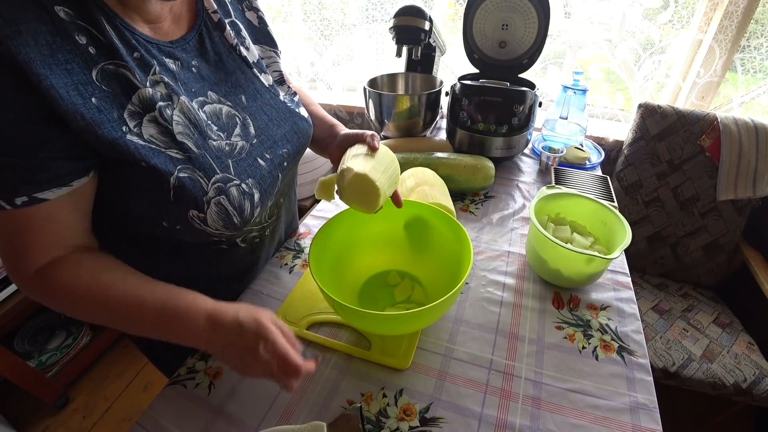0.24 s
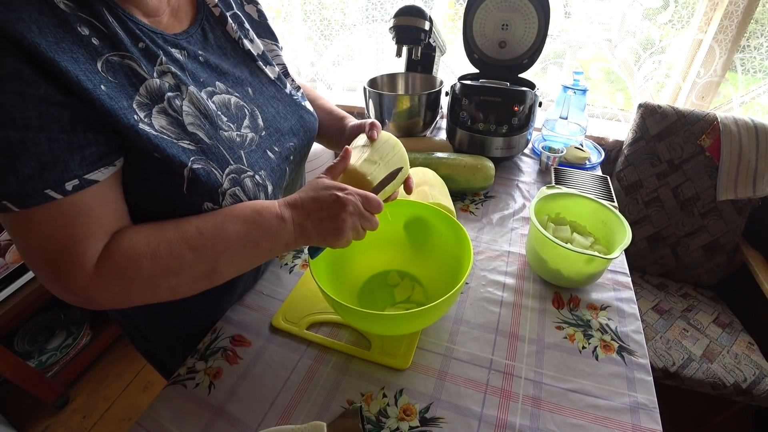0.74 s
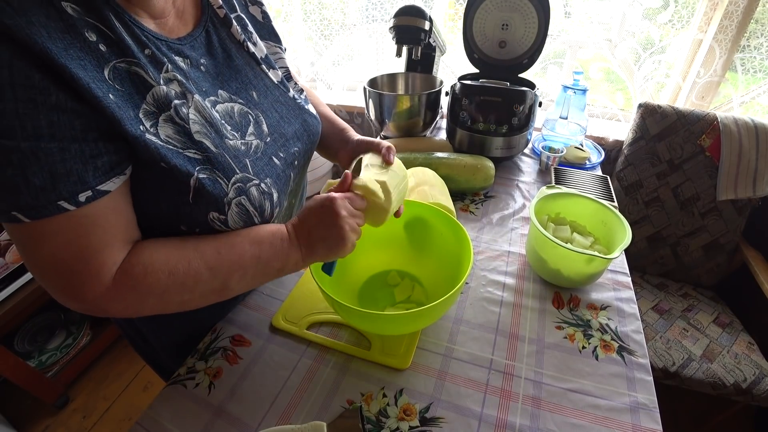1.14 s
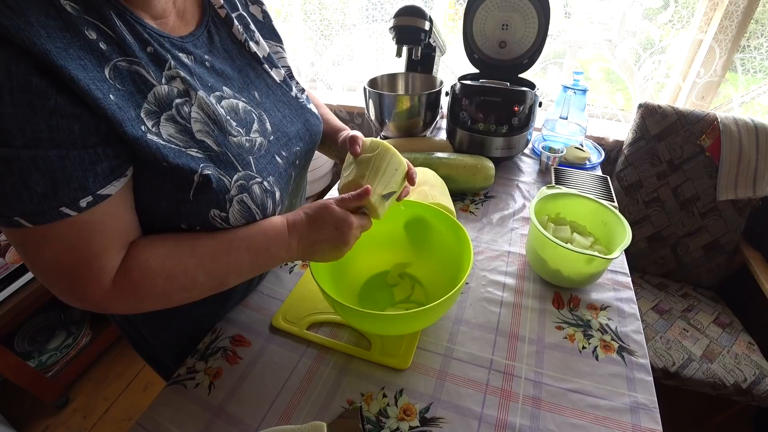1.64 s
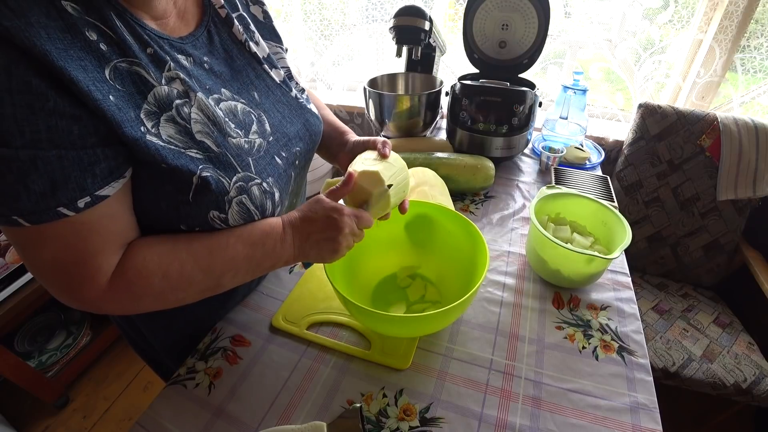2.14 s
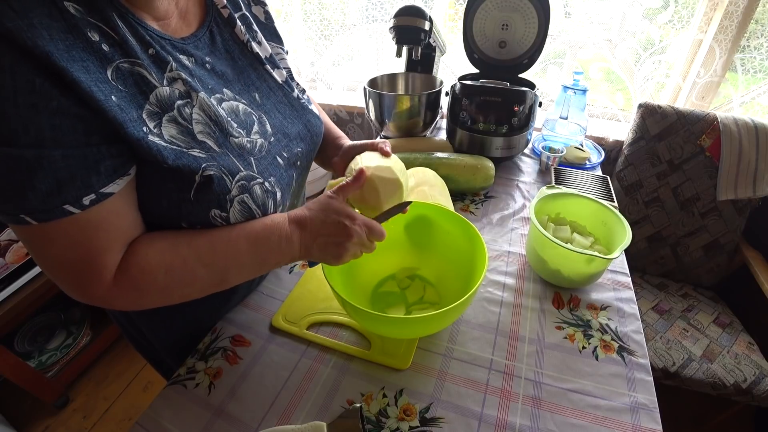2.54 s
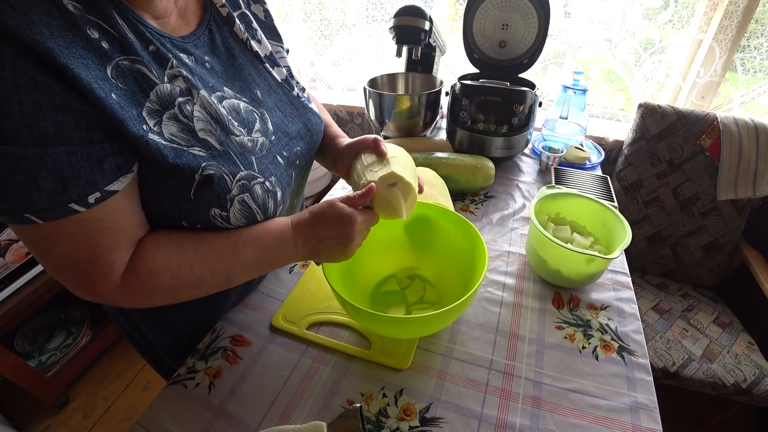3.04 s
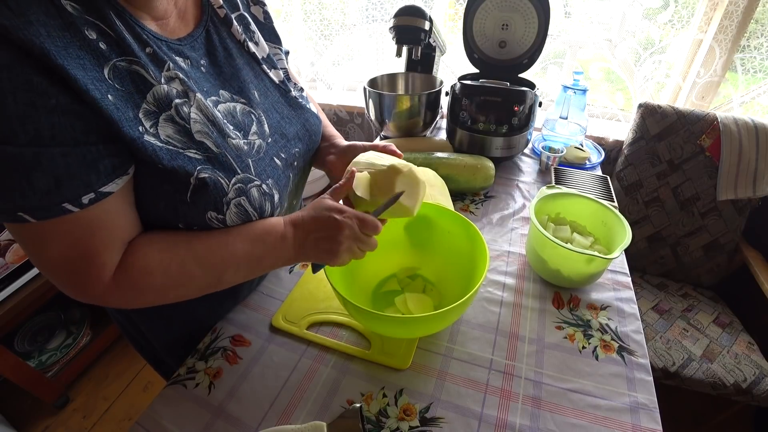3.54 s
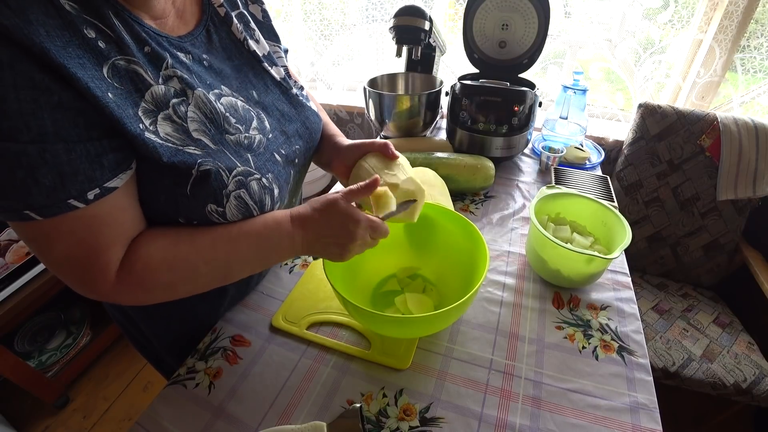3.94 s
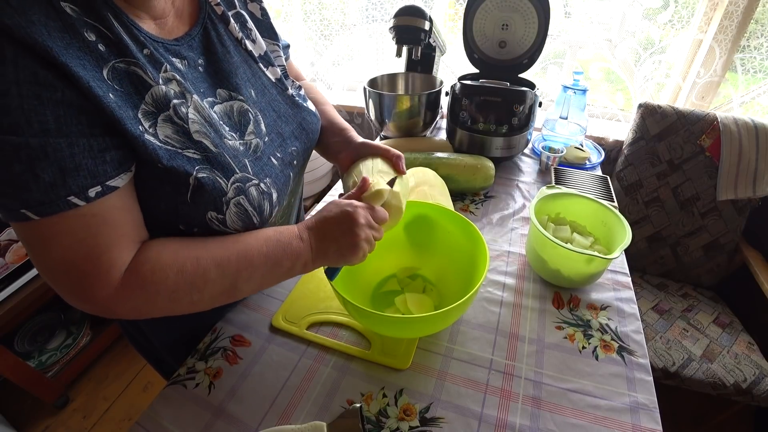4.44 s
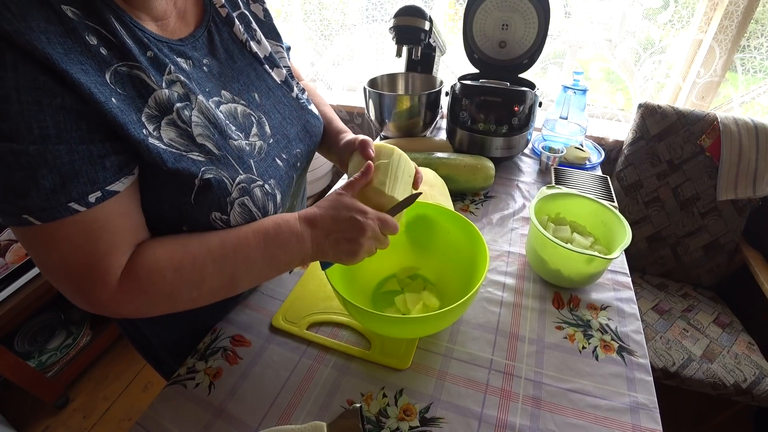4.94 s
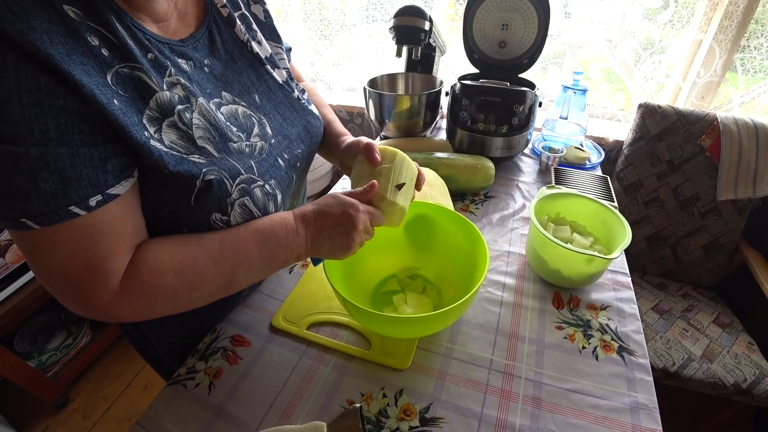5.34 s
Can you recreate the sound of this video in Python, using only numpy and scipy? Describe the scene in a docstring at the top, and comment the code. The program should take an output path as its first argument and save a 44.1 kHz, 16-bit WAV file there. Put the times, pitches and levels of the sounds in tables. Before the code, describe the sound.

Wet vegetable chunks knock into a plastic bowl as a knife scrapes and crunches through firm flesh in a humming kitchen.

```python
"""Cutting zucchini over a bowl

After a faint hiss of handling, a knife rasps through wet, peeled flesh in long draws and slips.
The flesh snaps through; chunks tumble into a plastic bowl, which rings.
Steel squeaks, hands rustle and bump. An appliance hums in the small kitchen."""
import sys
import numpy as np
from scipy import signal
from scipy.fft import rfft, irfft
from scipy.io import wavfile

SR = 44100
rng = np.random.default_rng(int(sys.argv[2]) if len(sys.argv) > 2 else 0)


def persist_wave(psi):
    """Save psi, clipped to +-1, as 16-bit WAV."""
    counts = np.round(np.clip(psi, -1, 1) * 32767).astype(np.int16)
    wavfile.write(sys.argv[1], SR, np.atleast_2d(counts).T)


N = 247309
TIME_S = np.arange(N) / SR
RING_S = TIME_S[:SR // 2]
ATTACK_SAMPLES, EARLY_SAMPLES = int(.008 * SR), int(.03 * SR)

# appliance hum (frequency [Hz], level [dB])
HUM_LINES = [(48.4, -51.5), (145.3, -64.5), (199.2, -66), (247.6, -70.5), (296.1, -59.5), (344.5, -78),
             (441.4, -70.5)]
# room air (frequency [Hz], relative density [dB])
AIR_SPECTRUM = [(20, 0.5), (45, -13), (80, 1), (120, -5), (250, -7), (450, -8.5), (800, -13.5),
                (1500, -19.5), (3200, -22), (3750, -17), (4300, -22.5), (7500, -22.5), (11000, -29)]
# stereo width of the air (frequency [Hz], side re mid [dB])
AIR_SIDE = [(60, -21), (110, -10), (190, -6.5), (350, -5.5), (620, -1.5), (1120, 2.5), (2010, 3),
            (3600, -3), (6460, -4.5), (11600, -2.5)]
# hands and knife brush cloth and skin (time [s], nominal length [s], centre [Hz], relative level [dB])
BRUSHES = [(0.0, 0.039, 322, -49), (0.0, 0.19, 200, -48.5), (0.062, 0.035, 730, -49),
           (0.145, 0.043, 910, -49.5), (0.176, 0.27, 610, -61), (1.61, 0.04, 310, -46.5),
           (1.805, 0.27, 197.5, -42.5), (2.195, 0.056, 503, -39), (2.271, 0.2, 200, -46),
           (2.402, 0.071, 201, -40.5), (4.041, 0.04, 900, -53)]
# steel squeaks (time [s], nominal length [s], end pitch [Hz], level [dB])
STEEL_SQUEAKS = [(0.065, 0.0045, 7300, -54), (0.085, 0.023, 9100, -61), (0.138, 0.0024, 9000, -38.5),
                 (0.155, 0.016, 8840, -53), (1.687, 0.0093, 7840, -42), (2.213, 0.018, 6280, -34.5)]
# first row: faint, soft hiss of handling or a sleeve before the cutting; other rows: blade draws
# (time [s], length [s], relative hiss [dB], rasp re hiss [dB])
RUBS = [(0.35, .32, -59, -20), (0.83, 0.41, -53.5, -18), (1.089, 0.079, -40, -15),
        (1.549, 0.13, -46.5, -10), (1.701, 0.1, -38.5, -13.5), (1.737, 0.17, -51, 10), (2.1, 0.21, -47, -6),
        (2.21, 0.042, -36.5, -6.5), (2.679, 0.18, -52, -4), (2.738, 0.3, -42.5, -12),
        (3.07, 0.089, -42.5, -9.5), (3.497, 0.31, -60, -22), (3.848, 0.12, -59, -11),
        (4.23, .46, -54, -8.5), (4.576, 0.085, -43, -15.5), (5.026, 0.2, -53, -8),
        (5.287, 0.13, -44.5, -10.5), (5.43, 0.047, -49.5, -15), (5.48, 0.14, -43, -13)]
# speed over a rub (position [0-1], speed [0-1])
RUB_SPEED = [(0, 0), (.18, 0.5), (.62, 1), (1, 0)]
# blade sticks and jumps (time [s], relative hiss [dB])
BLADE_SLIPS = [(.847, -54), (0.901, -53.5), (.949, -50.5), (0.983, -41.5), (1.015, -39), (1.054, -37),
               (1.089, -39.5), (1.662, -41.5), (1.691, -39), (1.814, -48.5), (2.153, -37.5), (2.18, -41),
               (3.757, -55), (3.801, -53), (4.323, -48), (4.378, -41.5), (4.433, -39.5), (4.463, -43.5),
               (4.508, -40), (4.641, -42.5), (5.072, -49.5), (5.199, -50.5), (5.305, -43.5)]
# bright friction (frequency [Hz], gain [dB])
HISS_SPECTRUM = [(1000, -13), (2900, -11), (3700, 2), (4400, -1.5), (5300, 1.5), (7800, 1.5), (9500, -1),
                 (11500, -5)]
# midrange friction (frequency [Hz], gain [dB])
RASP_SPECTRUM = [(300, -51), (700, -2.5), (1150, 3.5), (1700, 3), (2400, -3.5), (3500, -0.5), (6000, -62)]
# blade breaks through (time [s], knock [Hz], force [dB], sharpness [dB])
BREAKS = [(1.459, 1146, .5, 5.5), (1.58, 1173, -26.5, -1.5), (1.738, 980, -2.5, -39), (1.821, 1350, -13, 1),
          (1.83, 1150, -10, 0), (1.853, 1310, -15, -3), (1.886, 1580, -12, 0), (1.901, 1140, -9, -1.5),
          (1.952, 1500, -17.5, -3), (2.4, 1124, -1.5, 3.5), (3.118, 1674, -1, -4.5),
          (3.178, 1550, -19, -13), (4.974, 1210, -26.5, -9)]
# snap's thud, knock, tock, crack (base [dB], force slope [dB/dB], sharpness slope [dB/dB])
SNAP_MIX = [(-30, .85, -0.06), (-29.5, 0.52, .95), (-23, 1.06, 0), (-28, 1.3, 1.19)]
# damped thud of the flesh (frequency [Hz], weight [dB], t60 [s])
FLESH_MODES = [(218, -12, 0.073), (287, -7.5, 0.059), (376, 0.5, 0.011), (487, -13.5, 0.08),
               (523, -10.5, 0.075), (664, -6.5, 0.041)]
# higher tock of the firm vegetable (frequency [Hz], weight [dB], t60 [s])
TOCK_MODES = [(1817, -3, 0.012), (2022, -6.5, 0.019), (2246, -4, 0.016), (2650, 5, 0.0024)]
# blade, damped by flesh (frequency [Hz], weight [dB], t60 [s])
BLADE_MODES = [(2940, -21, 0.024), (4380, 19.5, 0.0087), (5320, 3, 0.022), (5670, -37, 0.031),
               (5705, 9.5, 0.054)]
# fracture (frequency [Hz], gain [dB])
CRACK_SPECTRUM = [(1200, -68), (2600, -56), (3200, 1), (3700, 3), (4800, 11.5), (6000, -1.5), (7500, -5),
                  (9500, -12.5), (11500, -17)]
# arms and table bump (time [s], pitch [Hz], relative level [dB])
ARM_BUMPS = [(1.751, 80, -48), (1.847, 62, -41), (1.999, 97, -45), (2.031, 35.3, -40.5),
             (2.289, 78.2, -46.5), (2.87, 63, -40.5), (2.918, 30.4, -43), (3.129, 69, -47)]
# chunks land and bounce (time [s], knock [Hz], force [dB], sharpness [dB])
LANDINGS = [(2.061, 1257, -0.5, -10), (2.092, 1294, -12, 4), (2.183, 1360, -12, 2),
            (2.2077, 1126, -13.5, 7), (2.432, 1280, -8, 8), (2.436, 1310, -10.5, 3), (2.464, 1080, -9, 1.5),
            (2.577, 1394, -9.5, -15), (2.633, 1185, -17.5, -6.5), (3.376, 1040, -23, -11),
            (3.38, 1077, -8.5, -2.5), (3.39, 1000, -22.5, 15), (3.411, 254, -16, -12),
            (3.495, 960, -29, -21), (5.013, 1120, -13, -10), (5.06, 1090, -24, -10)]
# landing's thud, knock, tock, slap (base [dB], force slope [dB/dB], sharpness slope [dB/dB])
LANDING_MIX = [(-25.5, 0.76, -0.1), (-20, 1.02, 0), (-28.5, 0.68, 0.48), (-33, 0.65, 0.97)]
# bowl bottom thuds on the board (frequency [Hz], weight [dB], t60 [s])
BOTTOM_MODES = [(176, -6, 0.072), (260.7, -3, 0.11), (335, 4, 0.064), (395, 7, 0.016), (485, 5, 0.045),
                (602, 0, 0.049)]
# long ring of the bowl (frequency [Hz], weight [dB], t60 [s])
BOWL_MODES = [(256, -7, .7), (427, 0, .3), (482, -6, .3), (518, -3, .35), (551, -6, .3), (598, -5, .35),
              (845, -7, .22), (971, -5, .29), (1103, -4, .33), (1254, 0, .22), (1521, -9, .3),
              (1682, -11, .25)]
# wet slap (frequency [Hz], gain [dB])
SLAP_SPECTRUM = [(700, -8), (1500, -9.5), (2800, 2.5), (4000, -6.5), (5500, -5), (7500, -11.5), (9500, -24),
                 (11500, -28)]
# window and wall reflections (nominal delay [s], gain [dB])
WALL_ECHOES = [(.0075, -13), (0.0169, -20.5), (0.0197, -16.5)]
# reverb decay (frequency [Hz], t60 [s])
ROOM_DECAY = [(150, 0.65), (400, 0.2473), (1000, 0.45), (2800, 0.3), (7500, 0.32)]
# reverb colour (frequency [Hz], gain [dB])
ROOM_SPECTRUM = [(100, -3), (250, -4), (500, 9.5), (1000, -4.5), (2200, -1.5), (5000, -9), (11000, -14)]


def undb(db):
    """Decibels to gain."""
    return 10 ** (np.asarray(db) / 20)


def unit(x, samples=None):
    """Scale to rms 1 over the first samples."""
    return x / np.sqrt(np.mean(x[:samples] ** 2) + 1e-20)


def lookup(points, hz):
    """Interpolate over log frequency."""
    points_hz, values = np.transpose(points)
    return np.interp(np.log(np.maximum(hz, 1)), np.log(points_hz), values)


def colour(x, spectrum, taps=4096):
    """Minimum-phase filter from a spectrum, via the cepstrum."""
    gain = undb(lookup(spectrum, np.fft.rfftfreq(taps, 1 / SR)))
    cepstrum = irfft(np.log(gain))
    cepstrum[1:taps // 2] *= 2
    cepstrum[taps // 2 + 1:] = 0
    return signal.fftconvolve(x, irfft(np.exp(rfft(cepstrum))))[:len(x)]


def band(x, low_hz, high_hz, order=2):
    """Band-pass."""
    sos = signal.butter(order, [low_hz, min(high_hz, SR / 2 - 1)], "band", fs=SR, output="sos")
    return signal.sosfilt(sos, x)


def add(out, time_s, x):
    """Mix x into out at time_s."""
    start = max(int(time_s * SR), 0)
    out[start:start + len(x)] += x[:max(N - start, 0)]


def fade(t60_s):
    """Exponential decay."""
    return np.exp(-np.log(1000) * RING_S / t60_s)


def mode(hz, t60_s):
    """One struck resonance."""
    return np.sin(2 * np.pi * hz * RING_S) * fade(t60_s)


def ringing(modes, scatter_db=1.0):
    """Struck modes; each blow lands elsewhere and weights them differently."""
    offsets_db = scatter_db * rng.standard_normal(len(modes))
    ring = sum((-1) ** k * undb(db + offsets_db[k]) * mode(hz, t60_s)
               for k, (hz, db, t60_s) in enumerate(modes))
    return unit(ring, ATTACK_SAMPLES)


def swell(length_s):
    """Envelope of a short rub, rms 1."""
    return unit(signal.windows.tukey(int(length_s * SR), .7))


def appliance_hum(waver_rad=0.056):
    """Motor lines, wavering slightly in phase."""
    hum = np.zeros(N)
    for hz, db in HUM_LINES:
        drift = np.interp(TIME_S, np.linspace(0, TIME_S[-1], 20), rng.standard_normal(20))
        phase_rad = 2 * np.pi * (hz * TIME_S + rng.random()) + waver_rad * drift * np.sqrt(hz / 50)
        hum += np.sqrt(2) * undb(db) * np.sin(phase_rad)
    return hum


def room_air(mid_db=-55):
    """Steady noise, narrow in the bass, diffuse in the mids."""
    mid, side = (unit(colour(rng.standard_normal(N), AIR_SPECTRUM)) for _ in range(2))
    return undb(mid_db) * (mid + colour(side, AIR_SIDE) * np.array([[1], [-1]]))


def rustles(gain_db=-4.5):
    """Skin, cloth and handle brush softly."""
    out = np.zeros(N)
    for time_s, length_s, hz, db in BRUSHES:
        envelope = swell(0.92 * length_s)
        friction = unit(band(rng.standard_normal(len(envelope)), hz / 1.52, hz * 1.394))
        add(out, time_s, undb(db + gain_db) * envelope * friction)
    return out


def squeaks(start_hz=9680, chatter_hz=1200):
    """Steel chatters at a high, unsteady pitch that falls as the blade slows."""
    out = np.zeros(N)
    for time_s, length_s, end_hz, db in STEEL_SQUEAKS:
        envelope = swell(1.4 * length_s)
        phase_rad = 2 * np.pi * np.cumsum(np.linspace(start_hz, end_hz, len(envelope))) / SR
        chatter = band(rng.standard_normal(len(envelope)), 15, chatter_hz)
        add(out, time_s, undb(db) * envelope * unit(chatter * np.sin(phase_rad)))
    return out


def grainy_friction(spectrum, grain_samples=16, spread_db=3, pops_per_s=120, pop_db=14):
    """Dense, uneven clicks with scattered larger pops; during cuts, plant cells bursting."""
    grains = undb(spread_db * rng.standard_normal(N // grain_samples + 1))
    strength = unit(np.repeat(grains, grain_samples)[:N])
    pops = (rng.random(N) < pops_per_s / SR) * undb(pop_db)
    return unit(colour(rng.standard_normal(N) * (strength + pops), spectrum))


def handling_and_slicing(rub_db=0.5, judder_db=1.62, slip_db=-2.5,
                         firm_s=.01485, firm_db=-40, doubling_db=20.5):
    """Soft handling hiss, then blade draws and slips; speed scales the friction, rubs judder."""
    hiss, rasp = np.zeros((2, N))
    for time_s, length_s, db, rasp_db in RUBS:
        speed = np.interp(np.linspace(0, 1, int(length_s * SR)), *np.transpose(RUB_SPEED))
        add(hiss, time_s, speed * undb(db))
        add(rasp, time_s, speed * undb(db + rasp_db))
    judder = undb(rub_db + judder_db * unit(band(rng.standard_normal(N), 13, 84)))
    hiss, rasp = hiss * judder, rasp * judder
    starts_s, lengths_s, _, rasps_db = np.transpose(RUBS)
    for time_s, db in BLADE_SLIPS:
        length_s = firm_s * 2 ** ((firm_db - db) / doubling_db)  # gentle slips drag
        push = swell(length_s) * undb(db + slip_db)
        rasp_db = np.interp(time_s, starts_s + lengths_s / 2, rasps_db)  # follows nearby rubs
        add(hiss, time_s, push)
        add(rasp, time_s, push * undb(rasp_db))
    return hiss * grainy_friction(HISS_SPECTRUM) + rasp * grainy_friction(RASP_SPECTRUM)


def burst(spectrum, t60_s, linger_db, linger_t60_s):
    """Sharp rupture, then weaker crumbling."""
    envelope = fade(t60_s) + undb(linger_db) * fade(linger_t60_s)
    return unit(colour(rng.standard_normal(len(envelope)) * envelope, spectrum), ATTACK_SAMPLES)


def reflected(parts, clutter_db=-5, clutter_t60_s=0.18):
    """Walls and table clutter echo a blow, by new paths each time; early rms 1 per part."""
    paths = rng.standard_normal(SR // 5) * fade(clutter_t60_s)[:SR // 5]
    paths *= undb(clutter_db) / np.linalg.norm(paths)
    paths[0] += 1  # direct sound
    for delay_s, db in WALL_ECHOES:
        paths[int(delay_s * SR * rng.uniform(.9, 1.1))] += undb(db)
    echoed = signal.fftconvolve(parts, [paths], axes=1)[:, :len(RING_S)]
    return np.array([unit(part, EARLY_SAMPLES) for part in echoed])


def blow(thud_modes, knock_hz, crack, levels_db, knock_t60_s=0.021, grit_db=-3, grit_t60_s=0.011):
    """Dull thud, hollow knock, woody tock and crack, with grit from crushed cells."""
    grit = [band(rng.standard_normal(len(RING_S)) * fade(grit_t60_s), *edges_hz)
            for edges_hz in [(230, 720), (750, 1690), (1800, 2660)]]
    low, middle, high = (unit(part, ATTACK_SAMPLES) * undb(grit_db) for part in grit)
    thud = low + ringing(thud_modes)
    knock = middle - unit(mode(knock_hz, knock_t60_s), ATTACK_SAMPLES)
    tock = high + ringing(TOCK_MODES)
    return undb(levels_db) @ reflected([thud, knock, tock, crack])


def snaps(gain_db=-5, blade_db=-6):
    """Flesh cracks and knocks against the blade; the steel pings."""
    out = np.zeros(N)
    for time_s, knock_hz, force_db, sharpness_db in BREAKS:
        levels_db = np.array(SNAP_MIX) @ [1, force_db, sharpness_db]
        crack = burst(CRACK_SPECTRUM, t60_s=.012, linger_db=-47, linger_t60_s=0.038)
        ping = undb(blade_db) * ringing(BLADE_MODES)
        add(out, time_s, blow(FLESH_MODES, knock_hz, crack + ping, levels_db))
    return undb(gain_db) * out


def bumps(gain_db=12.5, t60_s=0.17, rise_s=0.013):
    """Soft, heavy contacts of arms and table swing for a few cycles."""
    out = np.zeros(N)
    onset = 1 - np.exp(-RING_S / rise_s)
    for time_s, hz, db in ARM_BUMPS:
        add(out, time_s, undb(db + gain_db) * mode(hz, t60_s) * onset)
    return out


def landings(gain_db=-5, bowl_db=-11):
    """Wet chunks slap the plastic; harder hits ring the bowl louder."""
    out = np.zeros(N)
    for time_s, knock_hz, force_db, sharpness_db in LANDINGS:
        levels_db = np.array(LANDING_MIX) @ [1, force_db, sharpness_db]
        slap = burst(SLAP_SPECTRUM, t60_s=0.018, linger_db=-15, linger_t60_s=0.054)
        bowl = undb(np.mean(levels_db[:2]) + bowl_db) * ringing(BOWL_MODES)  # follows thud and knock
        add(out, time_s, blow(BOTTOM_MODES, knock_hz, slap, levels_db) + bowl)
    return undb(gain_db) * out


def room_response(rise_s=0.0012):
    """Diffuse tail in octave bands; builds fast, lows last longest."""
    tail = 0
    for hz in 125 * 2 ** np.arange(8):
        noise = band(rng.standard_normal(len(RING_S)), hz / np.sqrt(2), hz * np.sqrt(2), order=3)
        tail += noise * fade(lookup(ROOM_DECAY, hz))
    onset = 1 - np.exp(-(RING_S / rise_s) ** 2)
    return colour(tail * onset, ROOM_SPECTRUM)


def kitchen(x, wet_db, side_db, pan_db):
    """Direct sound plus stereo reverb, narrowest in the bass; positive pan is left."""
    mid = signal.oaconvolve(x, room_response())[:N] * undb(wet_db)
    side_response = colour(room_response(), [(250, -11), (800, -0.5)])
    side = signal.oaconvolve(x, side_response)[:N] * undb(wet_db + side_db)
    left_right = np.array([[1], [-1]])
    return (x + mid + side * left_right) * undb(left_right * pan_db / 2)


def scene():
    """Knife, chunks and hands over hum and air, in stereo."""
    hands = kitchen(rustles(), wet_db=-30, side_db=-5, pan_db=-0.8)
    friction = kitchen(squeaks() + handling_and_slicing(), wet_db=-32, side_db=-0.5, pan_db=0.8)
    cuts = kitchen(snaps(), wet_db=-33.5, side_db=-7, pan_db=-1.1)
    chunks = kitchen(landings(), wet_db=-35, side_db=-8, pan_db=-1.5)
    return appliance_hum() + room_air() + hands + friction + cuts + bumps() + chunks


def record(dry):
    """Steep low-pass."""
    cutoff_hz = 11060
    return signal.sosfilt(signal.ellip(10, .2, 70, cutoff_hz, fs=SR, output="sos"), dry)


dry = scene()
out = record(dry)
persist_wave(out)
```